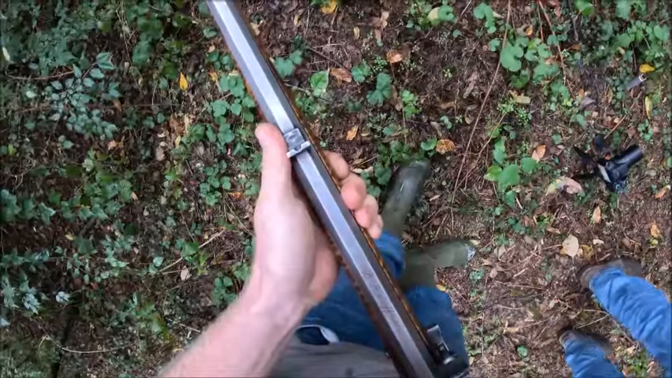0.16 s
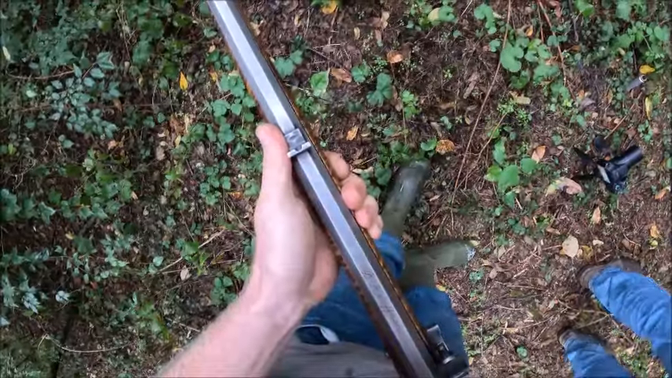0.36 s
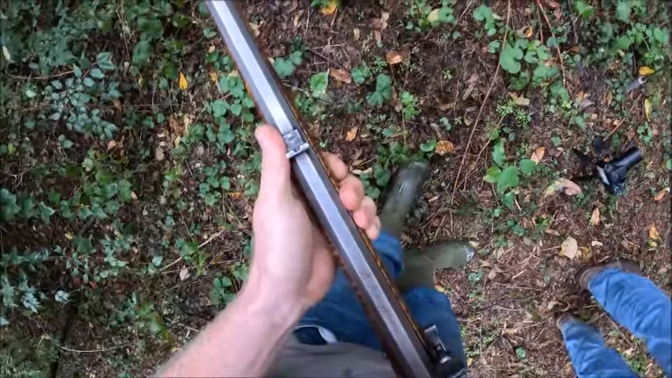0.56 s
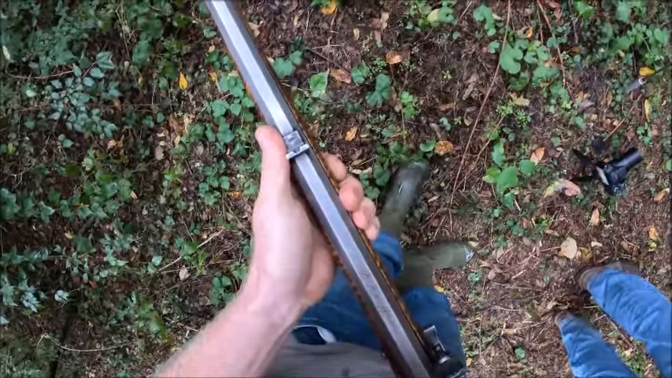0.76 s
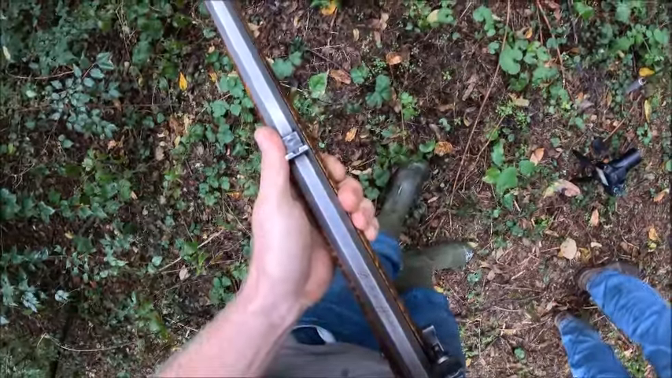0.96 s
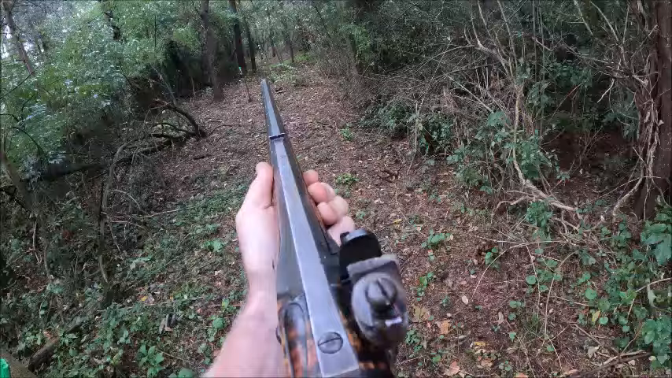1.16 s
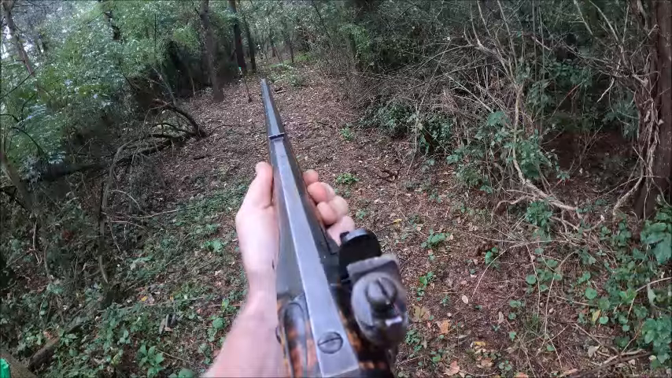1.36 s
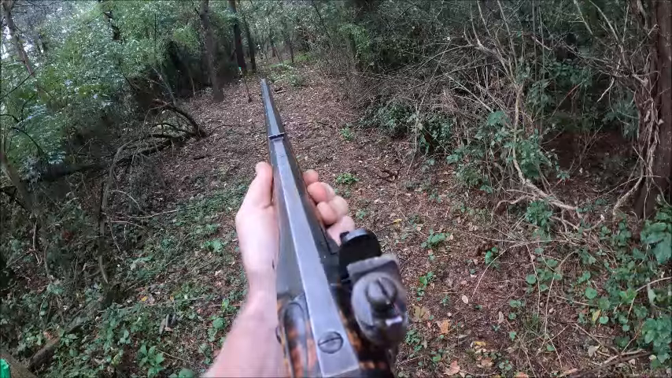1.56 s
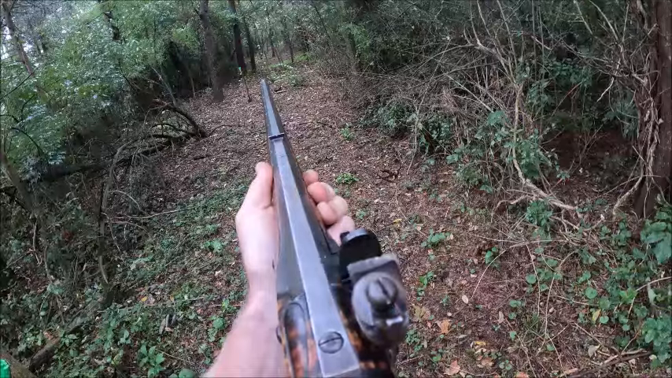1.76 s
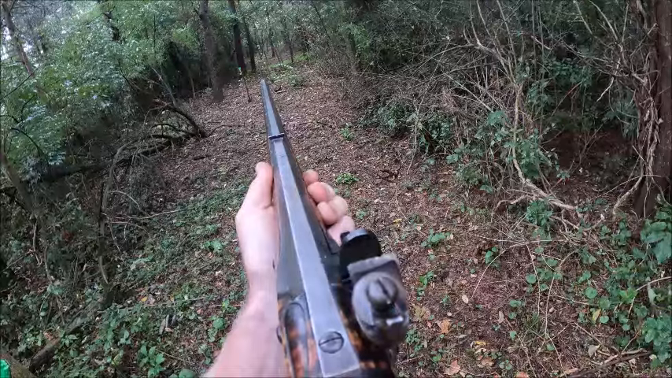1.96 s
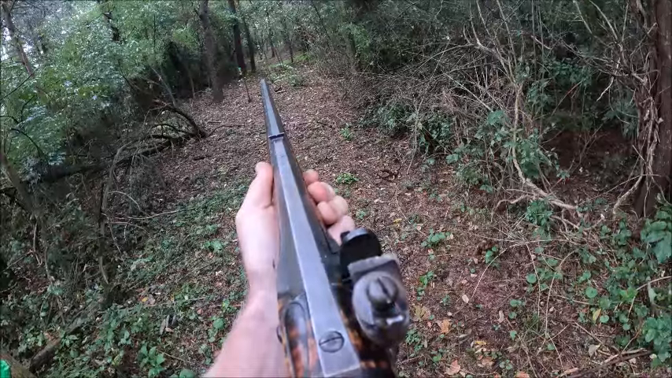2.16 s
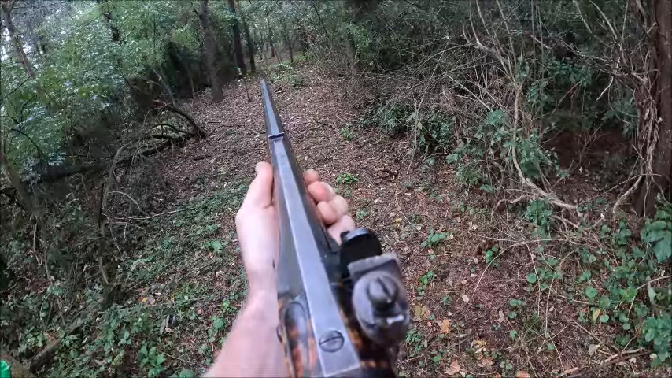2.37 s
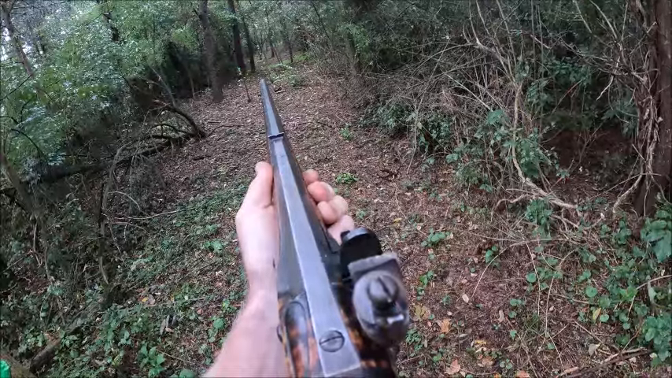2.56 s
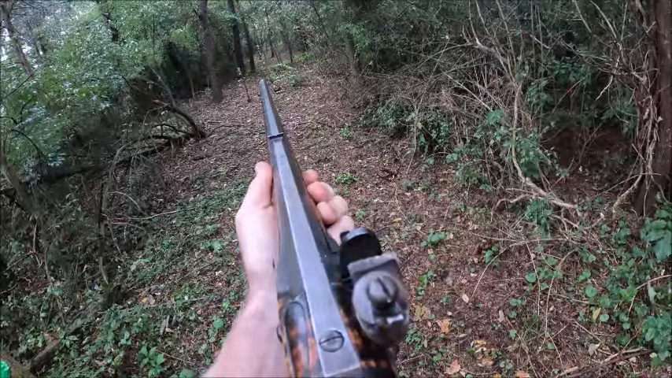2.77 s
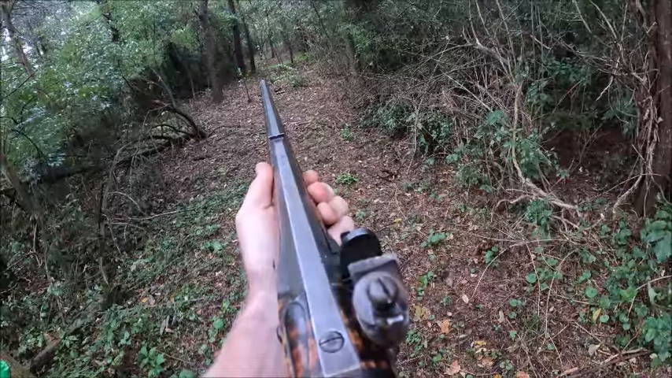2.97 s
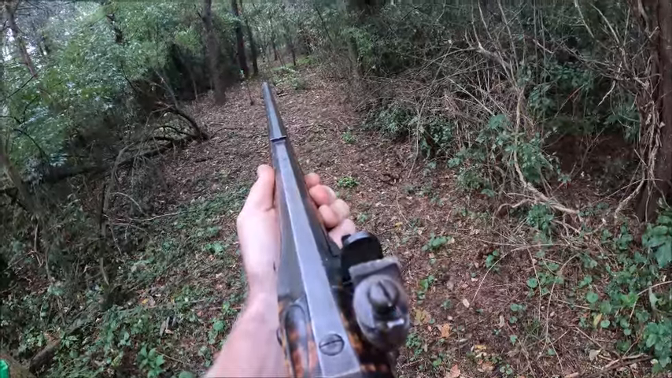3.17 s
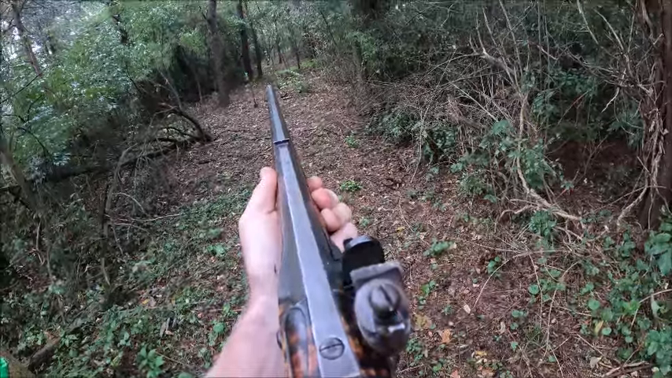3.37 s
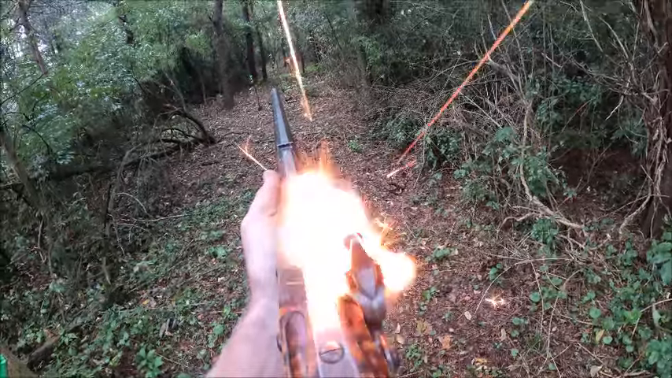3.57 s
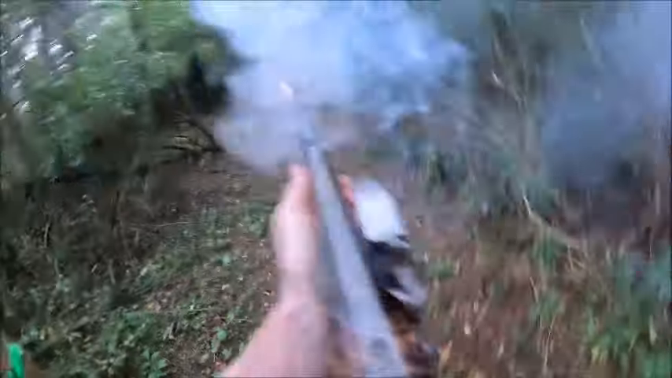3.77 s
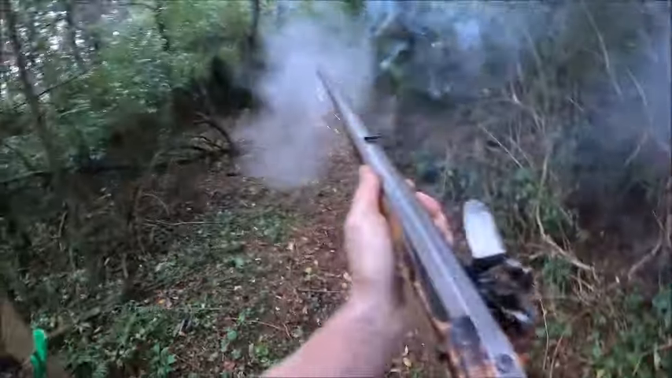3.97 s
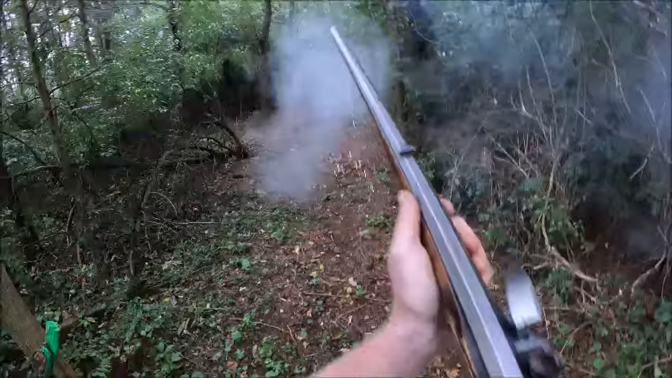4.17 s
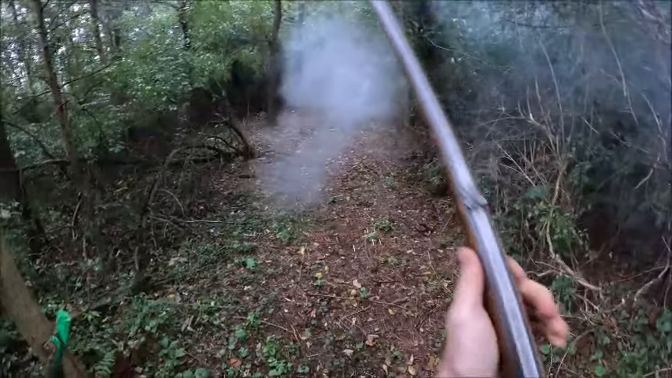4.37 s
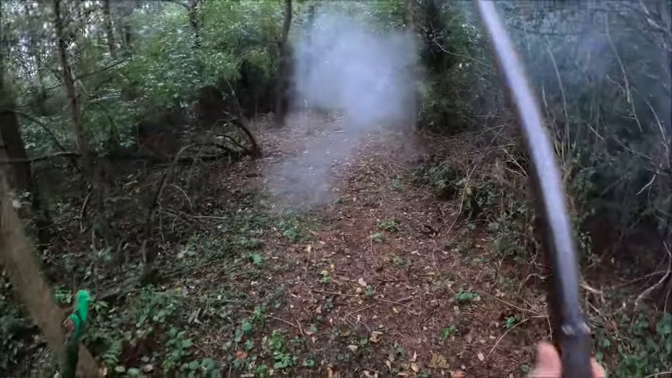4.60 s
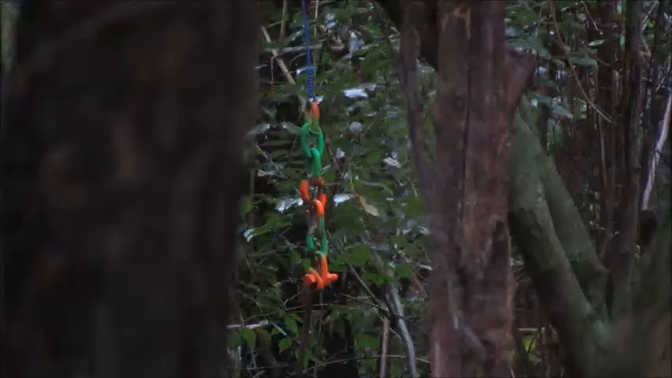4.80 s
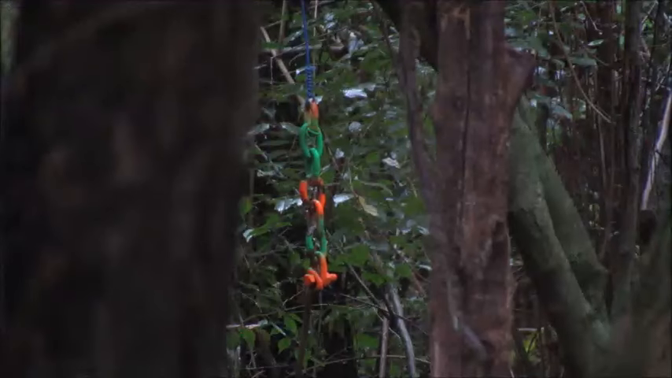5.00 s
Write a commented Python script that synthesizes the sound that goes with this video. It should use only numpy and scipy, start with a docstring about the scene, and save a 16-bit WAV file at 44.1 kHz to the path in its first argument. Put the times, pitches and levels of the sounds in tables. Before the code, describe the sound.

Six sharp wooden taps on a rifle stock, a quiet pause, then one flintlock shot echoing through damp woodland.

```python
"""A flintlock rifle, tapped on its stock, aimed and fired in a wet woodland heard from three spots in turn.
Each tap excites the damped modes of the wood. The trigger is set, flint strikes steel, the priming flares
and the charge goes off; the trees scatter the report, and absorption takes its treble with distance.
Drips tick on leaves over the hiss of the canopy and a far low drone."""
import sys
import numpy as np
from scipy import signal
from scipy.io import wavfile

SR = 44100
rng = np.random.default_rng(int(sys.argv[2]) if len(sys.argv) > 2 else 0)


def wav_out(sig):
    """Save sig, one row per channel (or a flat mono array), as 16-bit PCM at SR to the path in sys.argv[1]."""
    wavfile.write(sys.argv[1], SR, np.round(np.clip(np.atleast_2d(sig).T, -1, 1) * 32767).astype(np.int16))


N = 222131

# taps on the stock: t/s, level/dB, two pitches favoured by the point struck f/Hz, contact cut-off f/Hz
TAP_BLOWS = [(0.002, -34, 1800, 450, 3700), (0.1755, -16, 1570, 1810, 11000),
             (0.3655, -14.5, 1310, 3600, 14000), (0.4005, -31, 1910, 2530, 2980),
             (0.558, -17, 1730, 973, 13900), (0.626, -33.5, 690, 300, 1110), (0.641, -38.5, 515, 300, 1100),
             (0.795, -16.5, 2150, 3400, 14100), (0.9875, -15, 1320, 3140, 14000),
             (1.0195, -20.5, 1990, 3130, 5000), (1.2065, -12.5, 2530, 1320, 17000)]
# modes of the tapped stock: f/Hz, level/dB, T60/s
STOCK_MODES = [(185, -23, 0.04), (300, -21.5, 0.039), (450, -23.5, 0.18), (531, -20, 0.12),
               (690, -20.5, 0.067), (929, -17.5, 0.11), (1110, -5.5, 0.017), (1320, -1.5, 0.016),
               (1624, -6, 0.029), (1882, -8, 0.063), (2099, -6, 0.061), (2553, -2.5, 0.023),
               (3360, -2, 0.024), (4500, 4, 0.011), (5440, -7, 0.013), (7040, 8, 0.0046)]
# noise spectrum of a tap: f/Hz, level/dB
CRACK_SPECTRUM = [(240, -42), (400, -26), (1510, 3.5), (3680, -3), (5820, -12), (8930, -14.5), (11900, -28),
                  (15500, -62)]
# the clearest drips: t/s, peak level/dB, f/Hz
CLEAR_DRIPS = [(0.065, -41.5, 3500), (0.351, -39.5, 7500), (0.593, -49, 6000), (1.521, -49, 5994),
               (2.301, -43, 4900), (2.49, -45, 3920), (2.859, -45.5, 4500)]
# modes of the trigger: f/Hz, level/dB, T60/s
TRIGGER_MODES = [(990, -0.5, 0.0073), (1900, -5, 0.0049), (3400, -4, 0.0045), (5000, -3.5, 0.0052),
                 (7730, -14, 0.0044)]
# flint on steel, clatter of the lock, spurts of the discharge: t/s, level/dB, centre f/Hz
LOCK_BURSTS = [(3.6247, -15.5, 3300), (3.6263, -14.5, 6100), (3.6295, -5.5, 4630), (3.634, -6.5, 7700),
               (3.6386, -17, 2000), (3.6435, -20.5, 3800), (3.6545, -24, 4800), (3.67, -26, 2300),
               (3.6813, -32.5, 7000), (3.6925, -11.5, 7300), (3.694, -8, 6450), (3.6974, -13.5, 1000),
               (3.7018, -8, 1300), (3.7069, -8, 988)]
# noise spectrum of steel and gas: f/Hz, level/dB
STEEL_SPECTRUM = [(290, -30), (500, -3.5), (1080, -3.5), (1760, -0.5), (2310, -5.5), (2830, -10),
                  (3620, -5.5), (5190, -12), (7780, -11), (9260, -12.5), (15800, -25)]
# low thumps of the lock, the shot and its first echoes: t/s, level/dB, sign, extra level/dB below 120 Hz
LOW_THUMPS = [(3.636, -20.5, -1, 7), (3.6643, -28.5, 1, 16), (3.684, -23.5, -1, -2), (3.6957, -9.5, 1, -9),
              (3.7041, -11, -1, -13), (3.7101, -13, -1, -7.5), (3.7152, -33, 1, 26), (3.7329, -20, -1, 9),
              (3.746, -14, -1, -12), (3.7858, -18.5, 1, -17)]
# modes of a thump: f/Hz, level/dB, T60/s
THUMP_MODES = [(33.3, -13, 0.091), (97, -10.5, .05), (166.6, 2.5, 0.025), (335, -6, 0.055),
               (970, -2, 0.0092)]
# envelope of the echo from the trees: t/s, level/dB
ECHO_ENVELOPE = [(3.7, -22), (3.724, -31), (3.85, -29.5), (4.048, -27), (4.214, -35), (4.492, -44),
                 (4.82, -51)]
# spectrum of the echo at ECHO_ORIGIN_S: f/Hz, level/dB
ECHO_SPECTRUM = [(180, -50.5), (300, -11), (366, -9.5), (798, -11.5), (974, -6), (1500, -6.5), (1710, -5.5),
                 (6040, -15.5), (8990, -23), (15800, -42.5)]
# extra loss as the echo's path lengthens: f/Hz, loss rate/(dB/s)
ECHO_LOSS = [(300, 4.5), (500, -4), (1000, -4), (2000, 6.5), (4000, 23.5), (8000, 38), (11000, 74.5),
             (15000, 62)]
# spectrum of the boom: f/Hz, level/dB
BOOM_SPECTRUM = [(12, -40), (20, -19.5), (32, -17), (70, 1.5), (130, 5), (203, 7), (500, -24), (650, -50),
                 (1100, -120)]
# envelope of the boom: t/s, level/dB
BOOM_ENVELOPE = [(3.72, -28), (3.79, -31), (3.92, -34.5), (4.0, -45), (4.4, -62.5), (4.82, -74.5)]
# reflections from the nearest trunks: t/s, level/dB
TRUNK_SLAPS = [(3.733, -18.5), (3.742, -26), (3.7841, -15), (3.838, -24)]
# background spectrum, one for each spot: f/Hz, level/dB
WOODS_SPECTRA = [
    [(14, 14), (22, 10), (32, -6), (70, -8), (125, -14.5), (300, -21), (420, -32), (750, -32.5),
     (1400, -23), (2300, -33), (5000, -36), (9000, -47.5), (11500, -50.5), (15800, -70)],
    [(14, -23.5), (30, -5), (59, -7), (119, -16.5), (203, -25.5), (300, -29), (554, -34.5), (916, -24.5),
     (1700, -29), (2720, -34), (5170, -34), (9040, -45.5), (11500, -51), (15800, -73.5)],
    [(14, -43), (30, -20), (44, -4), (158, -5.5), (380, -21), (469, -16.5), (620, -54), (819, -21.5),
     (1150, -21), (4000, -30), (10400, -33.5), (14500, -34), (15800, -59)],
]
# background at each spot: level/dB
WOODS_LEVELS = [-48, -51.5, -47]
# left-right coherence of the noise: f/Hz, coherence
COHERENCE = [(60, 0.95), (130, 1), (290, 0.93), (640, 0.85), (1410, 0.76), (3100, 0.53), (6820, 0.85),
             (15000, 0.25)]
# balance of the noise: f/Hz, left minus right level/dB
BALANCE = [(60, -1), (2000, 1), (9000, 2)]

DRONE_HZ, DRONE_WIDTH_HZ, DRONE_DB = 55.2, 5.5, [-92, -50.5, -60]   # level/dB at each spot
FIRST_MOVE_S, SECOND_MOVE_S = 1.219, 4.824   # the listener changes spot
FLASH_S, FLINT_S, DISCHARGE_S, ECHO_ORIGIN_S = 3.623, 3.625, 3.693, 3.78
TIME = np.arange(N) / SR


def from_db(db):
    """Amplitude ratio of a level in dB."""
    return 10 ** (np.asarray(db) / 20)


def unit_rms(x):
    """The signal scaled to rms 1."""
    return x / np.sqrt(np.mean(x ** 2) + 1e-20)


def at_time(envelope):
    """Level in dB at every sample, silent outside the envelope's span."""
    return np.interp(TIME, *np.transpose(envelope), left=-140, right=-140)


def at_hz(points, hz):
    """Interpolation on a logarithmic frequency axis."""
    freqs, values = np.transpose(points)
    return np.interp(np.log(hz), np.log(freqs), values)


def drift(rate_hz):
    """Slow fluctuation of rms 1: low-passed noise, computed every 40th sample."""
    pole = np.exp(-80 * np.pi * rate_hz / SR)
    slow = signal.lfilter([1], [1, -2 * pole, pole ** 2], rng.standard_normal(N // 40 + 2002))[2000:]
    return np.interp(np.arange(N) / 40, np.arange(len(slow)), unit_rms(slow))


def ring(force, hz, t60):
    """Damped oscillator: a unit impulse starts a decaying sine of amplitude 1."""
    radius, angle = from_db(-60 / (t60 * SR)), 2 * np.pi * hz / SR
    return signal.lfilter([0, np.sin(angle)], [1, -2 * radius * np.cos(angle), radius ** 2], force + 1e-18)


def low_pass(x, hz, order=2):
    """Attenuation above a cut-off frequency."""
    return signal.sosfilt(signal.butter(order, hz, fs=SR, output="sos"), x)


def band_pass(x, hz, ratio):
    """Attenuation outside the band from hz / ratio to hz * ratio."""
    edges = [hz / ratio, min(hz * ratio, .45 * SR)]
    return signal.sosfilt(signal.butter(2, edges, "band", fs=SR, output="sos"), x)


def pan(db):
    """Left and right gains for a level difference."""
    return from_db([[db / 2], [-db / 2]])


def add(out, start_s, x):
    """Superposition of a short sound on the stereo signal."""
    i = round(start_s * SR)
    out[:, i:i + x.shape[-1]] += x[..., :N - i]


def noise_bands(size):
    """Partly coherent stereo white noise in third octaves: yields centre frequency and band."""
    white = rng.standard_normal((2, 2, size))
    for k, hz in enumerate(16 * 2 ** ((np.arange(30) + 0.5) / 3)):
        mid, side = band_pass(white[k % 2], hz, 2 ** (1 / 6))
        coherence = np.clip(at_hz(COHERENCE, hz), 0, 1)
        band = np.sqrt(1 + coherence) * mid + np.sqrt(1 - coherence) * side * [[1], [-1]]
        yield hz, band * pan(at_hz(BALANCE, hz))


def coloured_noise(spectrum, size):
    """Stereo noise of rms 1, its bands weighted by a spectrum."""
    return unit_rms(sum(from_db(at_hz(spectrum, hz)) * band for hz, band in noise_bands(size)))


def decay(t60, rise_s):
    """Envelope of a transient: quick rise, exponential decay."""
    t = np.arange(round(1.2 * t60 * SR)) / SR
    return (1 - np.exp(-t / rise_s)) * from_db(-60 * t / t60)


def surge(peak_s, db, rise_db_per_s, fall_db_per_s):
    """Gain that grows exponentially up to a moment and then decays."""
    t = TIME - peak_s
    return from_db(db + np.where(t < 0, rise_db_per_s, -fall_db_per_s) * t)


def spots():
    """Index of the listener's spot at every sample."""
    return np.searchsorted([FIRST_MOVE_S, SECOND_MOVE_S], TIME)


def hush(db):
    """Gain that lowers the background from the fall of the lock until the second move."""
    return from_db(db * (TIME > FLINT_S) * (spots() == 1))


def woods():
    """Canopy hiss and far rumble are broadband noise, coloured by the spot; each band flickers a little."""
    spot, out, gust = spots(), 0, drift(4.2)
    for hz, band in noise_bands(N):
        colour_db = np.array([at_hz(spectrum, hz) for spectrum in WOODS_SPECTRA])[spot]
        out = out + band * from_db(colour_db + 0.4 * gust + 1.1 * drift(9.7))
    for k in range(3):
        out[:, spot == k] = unit_rms(out[:, spot == k])
    return from_db(WOODS_LEVELS)[spot] * hush(-13.5) * out


def struck_stock(first_hz, second_hz):
    """Modal response to a blow: the point struck favours the modes near two pitches."""
    blow, wood = signal.unit_impulse(SR // 5), 0
    for k, (hz, db, t60) in enumerate(STOCK_MODES):
        chance = rng.normal(0, 1.5)
        nearness = np.exp(-(np.log2([hz / first_hz, hz / second_hz]) / 0.1) ** 2)
        gain = from_db(db + chance + 11.7 * nearness[0] + 11 * nearness[1])
        wood = wood + (-1) ** k * gain * ring(blow, hz * (1 + 0.0081 * chance), t60)
    wood *= 1 - np.exp(-TIME[:len(blow)] / 0.00056)   # contact lasts a millisecond or two
    return wood / np.abs(wood).max()


def taps():
    """Each impact radiates ringing wood and a noisy crack; harder contact passes more treble."""
    out, crack = np.zeros((2, N)), coloured_noise(CRACK_SPECTRUM, SR)
    direct, ground_echo, snap = decay(0.016, 0.0011), decay(0.16, 0.0035), decay(0.0032, 0.00039)
    for k, (start_s, db, first_hz, second_hz, cutoff_hz) in enumerate(TAP_BLOWS):
        knock = np.tile(struck_stock(first_hz, second_hz), (2, 1))
        for crack_db, shape in ((0.5, direct), (-28, ground_echo)):
            knock[:, :len(shape)] += from_db(crack_db) * shape * crack[:, k * 3000:k * 3000 + len(shape)]
        knock[:, :len(snap)] += from_db(-14.5) * snap * rng.standard_normal((2, len(snap)))
        add(out, start_s, from_db(db) * pan(-1.5) * low_pass(knock, cutoff_hz, order=3))
    return out * (TIME < FIRST_MOVE_S)


def drips(faint_count=6):
    """The impact of a drop is a tick of band-limited noise, its treble damped by wet leaves."""
    out, shape = np.zeros((2, N)), decay(0.012, 0.00051)
    faint = [(FIRST_MOVE_S + when * (FLINT_S - FIRST_MOVE_S), -50 + 3 * size, 4320)
             for when, size in rng.random((faint_count, 2))]   # scattered while the rifle is aimed
    for start_s, db, hz in CLEAR_DRIPS + faint:
        impact = rng.standard_normal(SR // 20)[:len(shape)] * shape
        tick = low_pass(band_pass(impact, hz, 3.2), 8000)
        add(out, start_s, from_db(db) * tick / np.abs(tick).max() * pan(rng.normal(0, 8.2)))
    return out


def hand_rustle():
    """Friction of a hand shifting on the stock gives a brief, uneven hiss."""
    envelope = surge(0.66, -59.5, rise_db_per_s=250, fall_db_per_s=420) * from_db(6.2 * drift(40))
    return envelope * unit_rms(band_pass(rng.standard_normal((2, N)), 5100, 1.47))


def drone():
    """Noise passed twice through a narrow resonance is heard as a low, wavering note."""
    t60 = np.log(1000) / (np.pi * DRONE_WIDTH_HZ)
    note = unit_rms(ring(ring(rng.standard_normal(N), DRONE_HZ, t60), DRONE_HZ, t60))
    return note * from_db(DRONE_DB)[spots()] * hush(-19.5)


def trigger():
    """Setting the trigger excites heavily damped modes, heard as a small click."""
    out, impulse = np.zeros((2, N)), signal.unit_impulse(SR // 50)
    click = sum(from_db(db) * ring(impulse, hz, t60) for hz, db, t60 in TRIGGER_MODES)
    add(out, 1.5109, from_db(-24.5) * click / np.abs(click).max())
    return out


def powder(noise):
    """Expanding gas hisses: the priming flares and dies, then the charge vents through the touch hole."""
    out, start = np.zeros((2, N)), round(FLASH_S * SR)
    flash = surge(FLASH_S, -30.5, rise_db_per_s=0, fall_db_per_s=330)
    vent = surge(DISCHARGE_S, -27.5, rise_db_per_s=901, fall_db_per_s=169.5)
    add(out, FLASH_S, noise * (flash + vent)[start:start + noise.shape[1]])
    return out


def lock_and_slaps(noise):
    """Steel impacts, gas spurts and their reflections are noise bursts, each with the lock plate's ring."""
    out, mid = np.zeros((2, N)), noise.mean(axis=0)
    close = mid + 0.5 * (noise - mid)   # close sources are more coherent left and right
    plate = ring(signal.unit_impulse(SR // 20), hz=2300, t60=0.026)
    slaps = [(start_s, db, 2100) for start_s, db in TRUNK_SLAPS]
    for start_s, db, hz in LOCK_BURSTS + slaps:
        t60 = np.clip(0.0044 * np.exp(-0.056 * db), 0.002, 0.05)   # fainter bursts last longer
        shape = decay(t60, 0.00045)
        offset = round(start_s * SR) - round(FLASH_S * SR) + SR // 5
        broad = close[:, offset:offset + len(shape)]
        narrow = unit_rms(band_pass(broad, hz, 1.45))
        add(out, start_s, from_db(db) * shape * (0.6 * broad + narrow))
        add(out, start_s, from_db(db - 17.5) * plate)
    return out


def thumps():
    """Low thumps of the lock, the shot and its first echoes: impulses excite damped modes."""
    out = 0
    start_s, thump_db, polarity, low_db = np.transpose(LOW_THUMPS)
    for hz, mode_db, t60 in THUMP_MODES:
        force = np.zeros((2, N))
        uneven = 1 + 0.32 * rng.standard_normal(len(start_s)) * [[1], [-1]]   # left against right
        impulses = np.sign(polarity) * from_db(thump_db + mode_db + low_db * (hz < 120))
        force[:, np.round(start_s * SR).astype(int)] = uneven * impulses
        out = out + ring(force, hz, t60)
    return low_pass(out, 1500)


def report():
    """Trunks scatter the blast into lumpy noise above a boom; air and leaves absorb its treble first."""
    start = round(ECHO_ENVELOPE[0][0] * SR)
    age_s, lumps_db = TIME[start:] - ECHO_ORIGIN_S, drift(37)[start:]
    out, echo, boom, midrange_power = np.zeros((2, N)), 0, 0, 0
    for hz, band in noise_bands(N - start):
        boom = boom + from_db(at_hz(BOOM_SPECTRUM, hz)) * band * (hz < 600)
        scattered = from_db(at_hz(ECHO_SPECTRUM, hz)) * band * (hz > 200)
        midrange_power += np.mean(scattered ** 2) * (600 < hz < 2500)
        echo = echo + scattered * from_db(lumps_db - at_hz(ECHO_LOSS, hz) * age_s)
    out[:, start:] = echo / np.sqrt(midrange_power) * from_db(at_time(ECHO_ENVELOPE)[start:])
    out[:, start:] += unit_rms(boom) * from_db(at_time(BOOM_ENVELOPE) + 2.2 * drift(33))[start:]
    return out


def scene():
    """Superposition of all sources at the two microphones."""
    out = taps() + hand_rustle() + drips() + trigger()
    steel_and_gas = coloured_noise(STEEL_SPECTRUM, SR // 2)
    out += powder(steel_and_gas) + lock_and_slaps(steel_and_gas) + report()
    return out + woods() + (thumps() + drone()) * pan(-1.5)


def record(dry, port_hz=9320, port_q=3.03, dip_hz=10220, dip_q=3.05, cutoff_hz=16400):
    """The microphone port's resonance lifts, then drops the treble; peaks saturate and the top is cut."""
    dip, port = 2 * SR * np.tan(np.pi * np.array([dip_hz, port_hz]) / SR)
    antiresonance = [dip ** -2, 1 / (dip * dip_q), 1]
    resonance = [port ** -2, 1 / (port * port_q), 1]
    heard = signal.lfilter(*signal.bilinear(antiresonance, resonance, SR), dry)
    rounded = 0.64 * np.tanh(heard / 0.75)
    return signal.sosfilt(signal.cheby2(12, 70, cutoff_hz, fs=SR, output="sos"), rounded)


dry = scene()
out = record(dry)
wav_out(out)
```